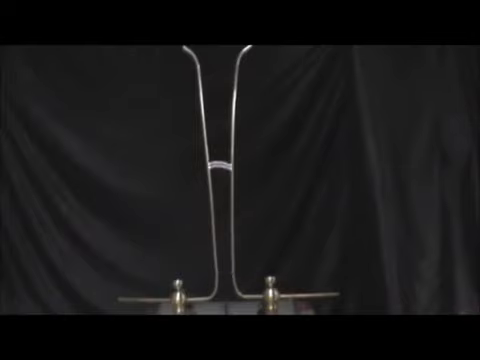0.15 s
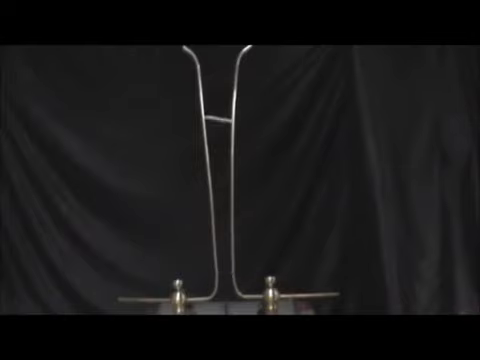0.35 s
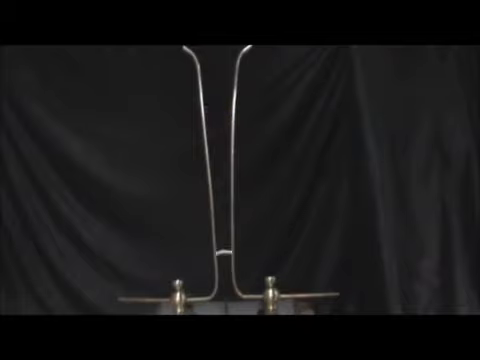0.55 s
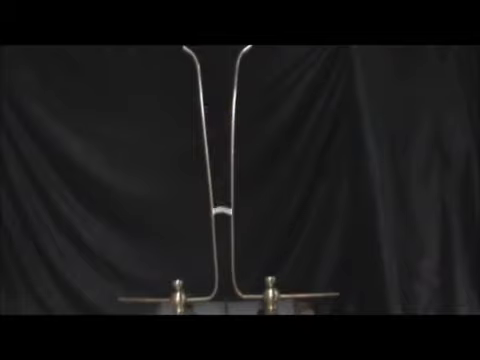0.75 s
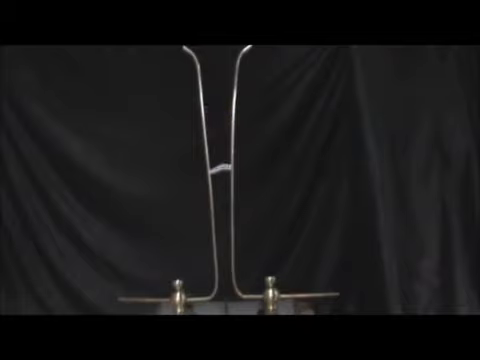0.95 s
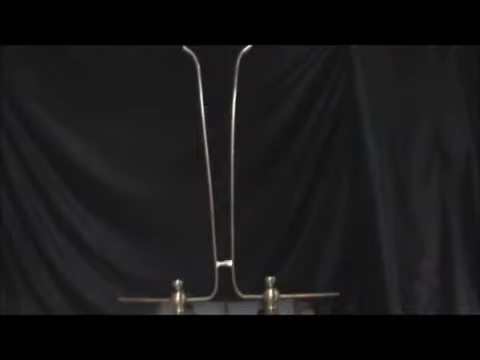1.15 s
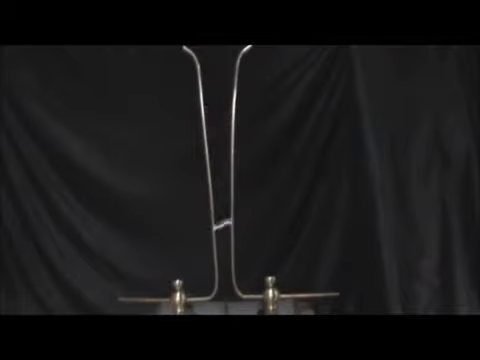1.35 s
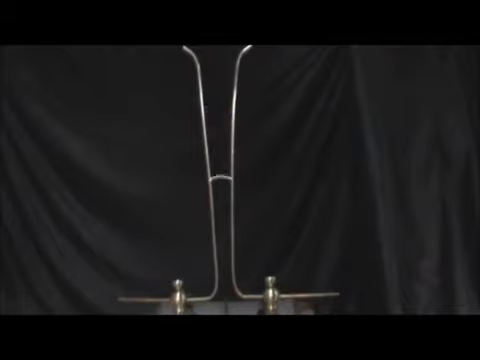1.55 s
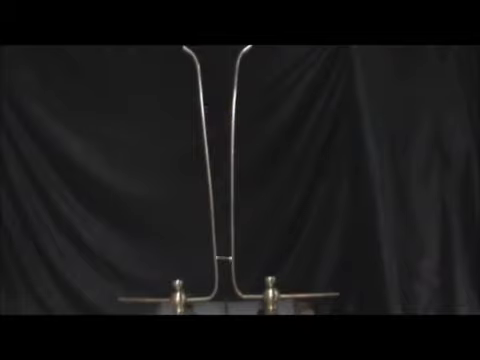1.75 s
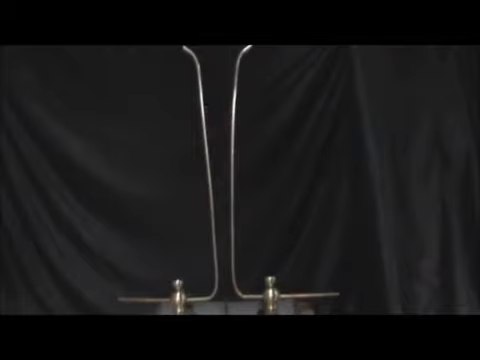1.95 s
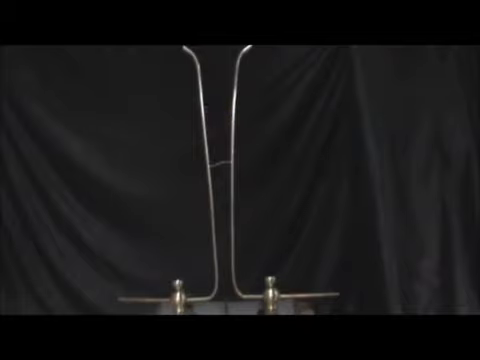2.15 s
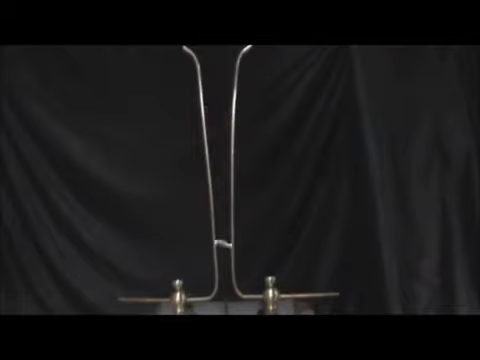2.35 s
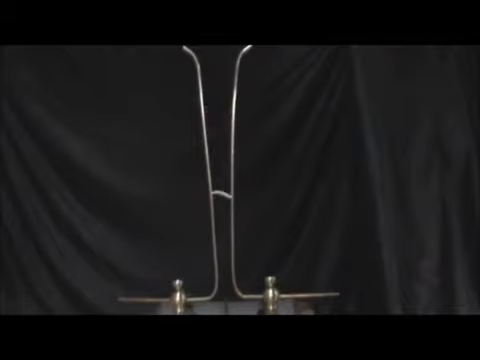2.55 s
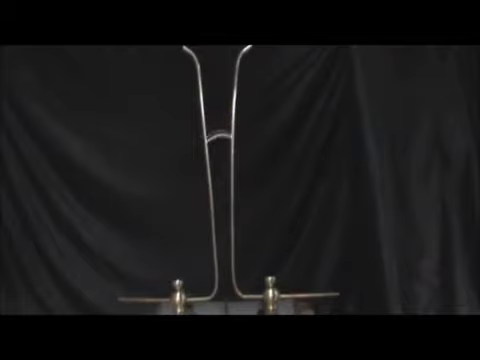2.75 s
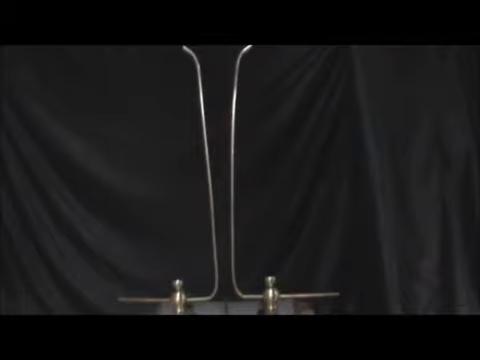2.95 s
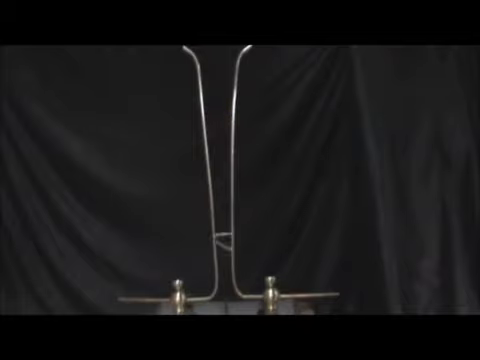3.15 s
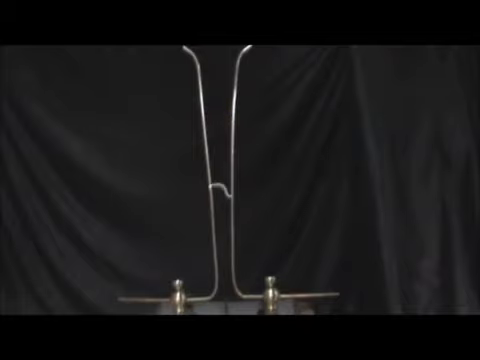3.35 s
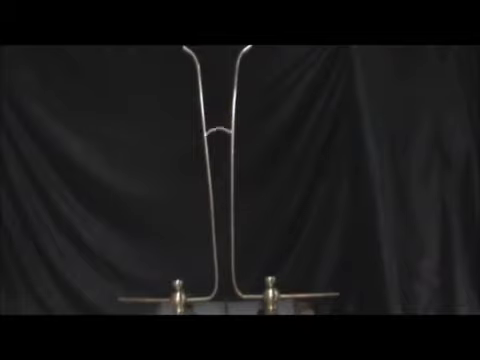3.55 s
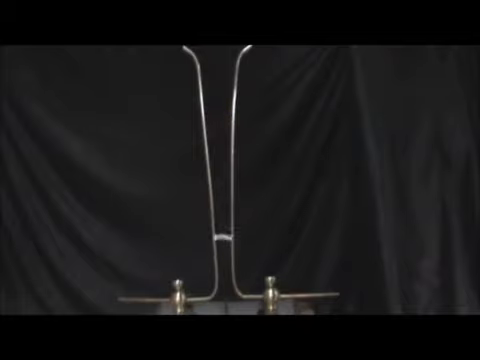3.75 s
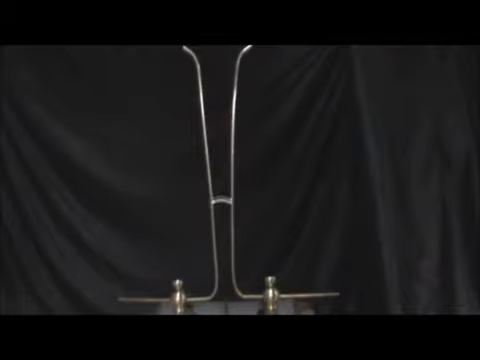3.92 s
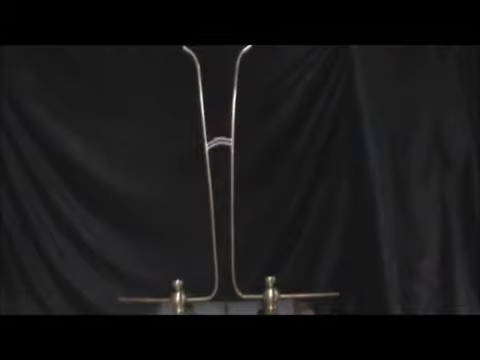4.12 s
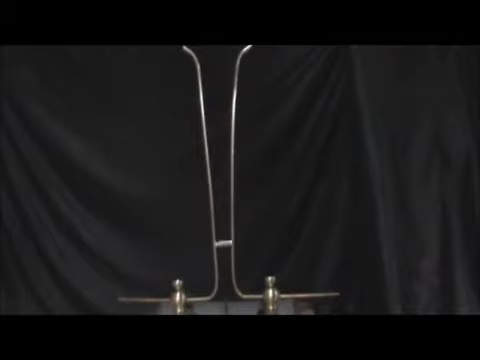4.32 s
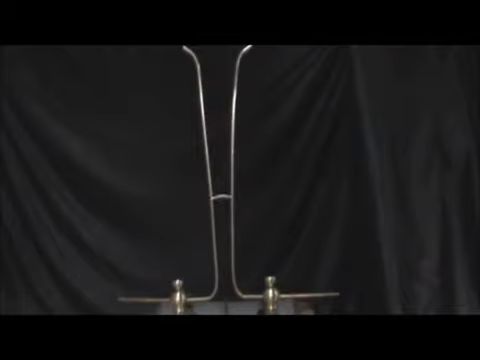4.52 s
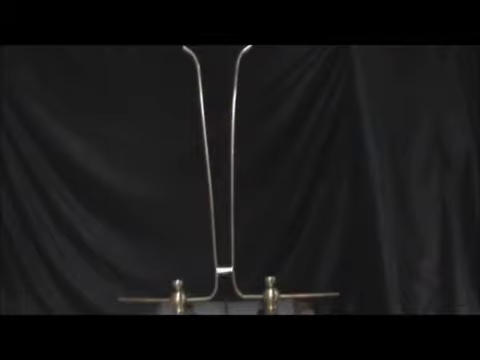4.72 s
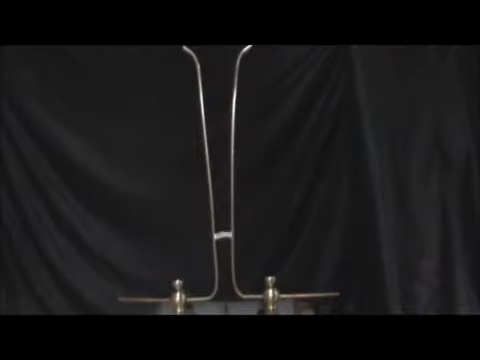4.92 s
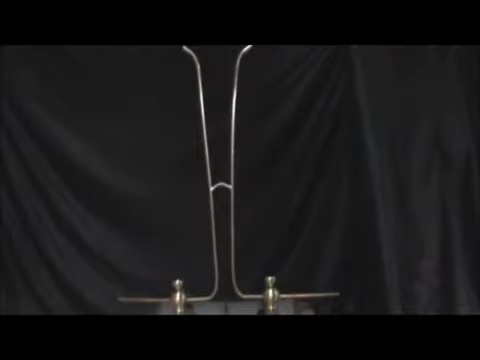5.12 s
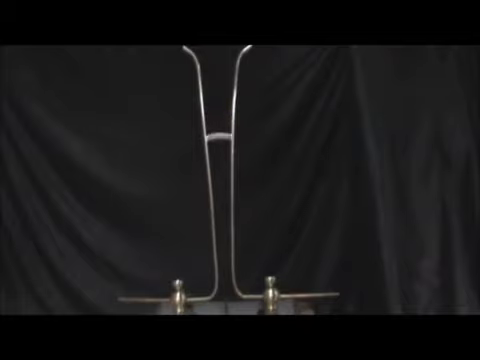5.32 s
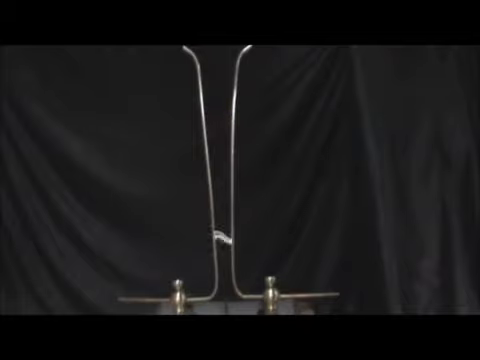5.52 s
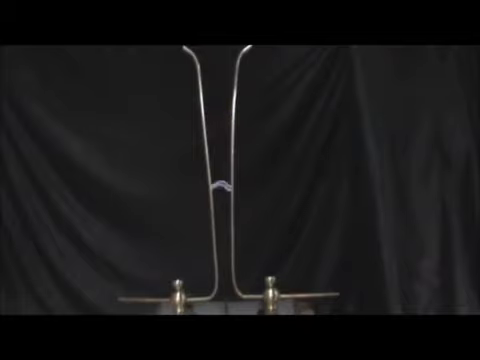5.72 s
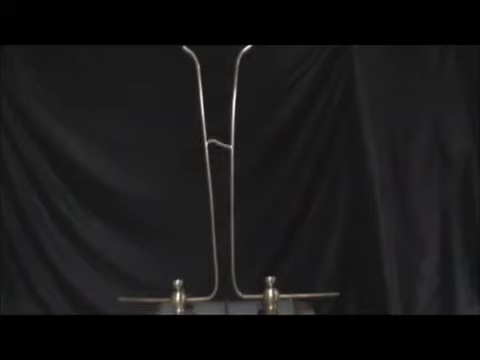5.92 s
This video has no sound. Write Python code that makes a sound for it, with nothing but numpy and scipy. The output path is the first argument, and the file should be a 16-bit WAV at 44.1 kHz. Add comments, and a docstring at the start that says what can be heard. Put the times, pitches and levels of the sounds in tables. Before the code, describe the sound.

An electric arc climbs two diverging wires in a draped room, close to a stereo microphone. A harsh, bright buzz of separate sparks runs throughout, slowing slightly and growing louder and raspier as each climb rises. Every half second or so it breaks off, then restarts at the bottom with a burst of hard snaps and low thumps. Brief skips interrupt it; faint hiss lies beneath.

```python
"""High-voltage climbing arc in a room

A coil fires some 75 sparks a second across two diverging wires, each a sharp click with echoes and scatter.
The arc climbs, breaks off and restrikes at the foot; its echo from the base lags more as it rises.
Now and then the coil misfires, and hard snaps kick the microphone's amplifier into a low thump.
One wall echo, a diffuse tail and a faint steady room hiss surround the sparks."""
import sys
import numpy as np
from scipy import signal
from scipy.fft import rfft, irfft, next_fast_len
from scipy.io import wavfile

SR = 44100
rng = np.random.default_rng(int(sys.argv[2]) if len(sys.argv) > 2 else 0)


def int16_out(signal):
    """Quantize to a 16-bit WAV file."""
    q = np.round(np.clip(np.atleast_2d(signal).T, -1, 1) * 32767)
    wavfile.write(sys.argv[1], SR, q.astype(np.int16))


N = 268035  # length [samples]


def arc(snaps, spark_db, snap_db, uneven_db, recharge_db, bright_db, snap_tilt_db, tilt_spread_db):
    """All sparks: height, a cooled channel and a longer charge of the coil set how loud each one fires."""
    cold_db, top_dull_db = 2.5, 1.1  # boost of a cold channel [dB]; brightness lost at the top [dB/octave]
    free = firing_times(snaps, jitter=.15)
    times = np.r_[free, snaps[:, 0]]
    order = np.sort(times)
    height, foot_db, top_db, power, climb_tilt_db, _, _ = climb(times)

    energy_db = (foot_db + (top_db - foot_db) * height ** np.abs(power))[:len(free)]
    energy_db = energy_db + cold_db * coldness(free, snaps)
    charge = np.interp(free, order[1:], np.diff(order)) * spark_rate(free)  # 1 = the usual interval
    free_db = energy_db + recharge_db * np.log2(charge) + uneven_db * rng.standard_normal(len(free))
    level_db = np.r_[free_db + spark_db, snaps[:, 2] + snap_db]

    tilt_db = bright_db + climb_tilt_db - top_dull_db * height
    tilt_db = tilt_db + tilt_spread_db * rng.standard_normal(len(times))
    tilt_db[len(free):] += snap_tilt_db
    return cracks(times, level_db, tilt_db, base_db=-11.5, terminal_db=-18.5, terminal_lead_ms=0.34,
                  rasp_hz=4390, rasp_width_hz=770, scatter_db=-3, scatter_t60=0.0079, size=512)


def cracks(times, level_db, tilt_db, base_db, terminal_db, terminal_lead_ms,
           rasp_hz, rasp_width_hz, scatter_db, scatter_t60, size):
    """Each spark is a sharp shock, then echoes from terminals and base, then scatter from the apparatus."""
    foot_lag_ms = 0.838  # lag of the base echo with the arc at the foot
    hz, t = np.fft.rfftfreq(size, 1 / SR), np.arange(size) / SR
    height, *_, rasp_db, top_lag_ms = np.array(climb(times))[:, :, None]

    def late(ms):
        """A pure delay, as a turn of phase."""
        return np.exp(-2j * np.pi * hz * ms / 1000)

    lag_ms = foot_lag_ms + (top_lag_ms - foot_lag_ms) * height
    echoes = amp(base_db) * late(lag_ms) + amp(terminal_db) * late(lag_ms - terminal_lead_ms)
    scatter = rng.standard_normal((2, len(times), size)) * np.sqrt(t) * amp(-60 * t / scatter_t60)
    scatter = amp(scatter_db) * rfft(scatter / np.linalg.norm(scatter, axis=2, keepdims=True))

    # near the top the long arc rasps in the upper middle
    rasp = rasp_db * height ** 2 * np.exp(-((hz - rasp_hz) / rasp_width_hz) ** 2)
    octaves = np.log2(np.clip(hz, 3000, 16000) / 8000)
    shock_db = level_db[:, None] + tilt_db[:, None] * octaves + rasp
    shock = amp(shock_db) * late(1)  # 1 ms into its frame, to hold the whole rise
    middle = placed(times - .001, irfft(shock * (1 + echoes + scatter[0])))
    side = placed(times - .001, irfft(shock * scatter[1]))
    return spread([middle, side])


# Plain misfires, where the coil skips a beat: (time of the next spark [s])
MISFIRES = [0.962, 1.129, 1.622, 2.018, 3.874, 3.958, 4.577, 5.769, 5.817]


def firing_times(snaps, jitter):
    """Ordinary sparks: an uneven train that runs from snap to snap and stops for each pause."""
    misfire_s, recharge_s = .024, .005  # pause of a misfire; least distance from a snap
    resume = np.r_[snaps[:, 0], MISFIRES]
    pause = np.r_[snaps[:, 1] / 1000, np.full(len(MISFIRES), misfire_s)]
    marks = np.sort(np.r_[0, resume - pause, resume, N / SR])
    waits = np.exp(jitter * rng.standard_normal((len(marks), 100)))
    times = []
    for start, end, wait in zip(marks, marks[1:], waits):
        if end - start < recharge_s:
            continue
        middle = (start + end) / 2
        dead = np.any((resume - pause < middle) & (middle < resume))
        # a dead stretch holds only the spark that ends it
        count = 1 if dead else max(1, round((end - start) * spark_rate(middle)))
        steps = np.cumsum(wait[:count] / spark_rate(np.linspace(start, end, count, endpoint=False)))
        times.extend(start + (end - start) * steps / steps[-1])
    times = np.array(times[:-1])
    return times[np.abs(times[:, None] - snaps[:, 0]).min(axis=1) > recharge_s]


def spark_rate(times):
    """Sparks a second, slowing as the arc rises: a wider gap takes longer to break down."""
    foot_rate, top_rate = 79, 70
    return foot_rate + (top_rate - foot_rate) * climb(times)[0]


FIRST_CLIMB_S = -.17  # the first climb is under way at the start


def coldness(times, snaps):
    """1 just after a pause that cools the channel, falling to 0 as the sparks reheat it."""
    cool_ms, reheat_s = 22, 0.057  # a snap's pause must be longer than this to cool; decay time
    resume = np.sort(np.r_[FIRST_CLIMB_S, snaps[snaps[:, 1] > cool_ms, 0], MISFIRES])
    since = times - resume[np.searchsorted(resume, times + 1 / SR) - 1]
    return np.exp(-since / reheat_s)


# The climb under way at the start, then one after each restrike:
# (relative energy at the foot [dB], at the top [dB], power of the height that it follows,
#  relative brightness [dB/octave], rasp at the top [dB], lag of the base echo at the top [ms])
CLIMBS = [(-14, -14, 1.2, -0.56, 7.5, 1.45), (-17, -6, 4.4, 0, 3.5, 1.314),
          (-16.5, -14, 1.96, 0.1, 4.5, 1.325), (-16, -12.5, 1.38, 0.4, 3, 1.3),
          (-16.5, -9, 1.97, 0, 7.5, 1.47), (-16, -14.5, 0.77, 0.76, 3, 1.345),
          (-17, -14.5, 1.6, 0.5, 3, 1.336), (-17, -10.5, 5.1, 0.7, 3, 1.263),
          (-18, -13, 0.78, -0.5, 0.5, 1.284), (-16.5, -6.5, 5.1, 0.5, 4, 1.318)]


def climb(times):
    """The arc's height (0 at the foot, 1 at the top) at these times, and the columns of its climb."""
    edges = np.r_[FIRST_CLIMB_S, np.array(RESTRIKES)[:, 0], N / SR]
    which = np.clip(np.searchsorted(edges, times, side="right") - 1, 0, len(CLIMBS) - 1)
    height = np.clip((times - edges[which]) / np.diff(edges)[which], 0, 1)
    return height, *np.array(CLIMBS)[which].T


# Single hard snaps during a climb:
# (time [s], pause before [ms], relative spark energy [dB],
#  left swing peak, right swing peak [signed, 1 = full scale])
SNAPS = [(0.2799, 25.4, -14, -0.014, .013), (0.5362, 17, -12.5, .003, 0.0011), (0.765, 31, -13, .104, .104),
         (0.8016, 26.8, -12.5, .051, 0.063), (0.8576, 14, -16.5, 0.0092, -.013),
         (1.1937, 27, -15, .1, -.003), (1.2097, 16, -11.5, .118, 0.089), (1.2224, 13, -10, -.027, -0.0033),
         (1.2347, 13, -11.5, .108, -.027), (1.3172, 28, -14.5, .105, .105),
         (1.6354, 14.8, -10.5, -0.0059, 0.0013), (1.9096, 23.4, -13.5, .046, 0.081),
         (2.0973, 32, -10.5, .001, -0.0012), (2.2301, 18.6, -12, 0.12, .1),
         (2.258, 14.7, -12.5, -.011, .03), (2.4023, 29.5, -13.5, .12, 0.11),
         (2.4596, 17.7, -18, 0.0043, 0.026), (2.8574, 24.4, -9.5, -0.047, 0.043),
         (3.0676, 13.8, -13.5, -0.0091, 0.068), (3.2965, 14.8, -18, 0.11, 0.093),
         (3.3081, 12, -13.5, 0.073, 0.062), (3.421, 26, -17, 0.032, .035),
         (3.9809, 23.8, -19.5, -.018, 0.053), (4.0415, 20, -16.5, -0.039, 0.0317),
         (4.0786, 22, -13.5, .1, .12), (4.1395, 27.3, -13.5, -0.038, 0.051),
         (4.1767, 14.6, -12.5, -.057, 0.049), (4.3826, 52, -13, .13, 0.098), (4.5466, 41, -13.5, .088, .11),
         (4.6554, 35, -13, .12, 0.11), (5.2034, 24.4, -10.5, 0.11, .12), (5.2474, 14.5, -10.5, .14, .087),
         (5.33, 16.2, -11, -0.0057, 0.022)]
# Restrikes, where the arc breaks off and starts again at the foot in a run of hard snaps:
# (time [s], pause before [ms], snaps [count], first interval [ms], later intervals [ms],
#  relative spark energy [dB], swing peak before the swell [1 = full scale],
#  greatest lean to the left [1 = full scale])
RESTRIKES = [(0.6114, 16, 5, 7, 14.3, -13, 0.1, .12), (1.2615, 26, 4, 6.7, 10.5, -12, .108, 0.074),
             (1.8191, 37, 2, 11.3, 13, -12.5, 0.1, .025), (2.3284, 24, 3, 12, 11.7, -11, 0.1, .045),
             (3.1025, 35, 8, 13.5, 13.15, -14, 0.081, .075), (3.7096, 26, 3, 11.4, 11.5, -14, 0.067, .038),
             (4.2958, 14, 3, 11.8, 10.9, -13.5, 0.083, .002), (4.844, 16, 4, 8.5, 14, -13, 0.082, .07),
             (5.5197, 14, 5, 11, 13.7, -14, 0.087, -.055)]


def hard_snaps():
    """Single snaps and the runs of the restrikes, which swell and sag, all as rows like those of SNAPS."""
    crest, sag_db = 0.47, 15.5  # share of the run where it crests; sag by the square of the distance from it
    lean_crest, lean_width = 0.29, 0.19  # thumps are lopsided early, then even out (shares of the run)
    jitter_ms, uneven_db = 0.97, 0.9  # scatter of the later snaps in time, and of all in strength
    rows = list(SNAPS)
    for s, pause_ms, count, first_ms, later_ms, energy_db, peak, most_lean in RESTRIKES:
        for k, (slip, chance) in enumerate(rng.standard_normal((round(count), 2))):
            after_ms = first_ms + later_ms * (k - 1) if k else 0
            if k > 1:
                after_ms += jitter_ms * slip
            share = (k + .5) / round(count)
            swell_db = uneven_db * chance - sag_db * (share - crest) ** 2
            thump = peak * amp(swell_db)
            lean = most_lean * np.exp(-((share - lean_crest) / lean_width) ** 2)
            rows.append((s + after_ms / 1000, 0 if k else pause_ms, energy_db + swell_db,
                         thump + lean, thump - lean))
    return np.array(rows)


def thumps(snaps, kick_s, recover_s, kick_share, tick_db, coupling_hz):
    """Interference kicks each amplifier channel; it swings back and settles through coupling capacitors."""
    s, _, energy_db, left, right = snaps.T
    t = np.arange(SR // 20) / SR

    def hump(rise):
        """A rise to 1 and a slower fall."""
        return t / rise * np.exp(1 - t / rise)

    def coupled(x):
        """The coupling capacitors, as a high-pass."""
        return signal.lfilter(*signal.butter(2, coupling_hz, "high", fs=SR), x)

    kick = -coupled(hump(kick_s) ** 2)
    swing = coupled(hump(recover_s)) + kick_share * kick
    swing = swing / swing.max()
    ticks = amp(energy_db + tick_db)[:, None] * kick  # even without a swing, a snap leaves a short pop
    return np.array([placed(s, ticks + peak[:, None] * swing) for peak in (left, right)])


# Spectrum of one spark's pressure click: (frequency [Hz], relative level [dB])
CLICK = [(40, -39.5), (160, -11), (550, -17.5), (1000, -10.5), (2000, -8), (4000, -3.5), (6500, -4),
         (8500, -2), (10200, 2), (12200, -3), (14900, -2), (15500, -17.5), (16300, -39)]
# Peaks and notches of the microphone housing: (centre [Hz], width [Hz], gain [dB])
HOUSING = [(1380, 240, -2.5), (2487, 114, -6.5), (4890, 470, 5.5), (5734, 194, -5.5), (7245, 197, -7)]


def coloured(x, size):
    """The spectrum of the spark's click, heard through the microphone housing."""
    hz = np.fft.rfftfreq(size, 1 / SR)
    housing_db = sum(db * np.exp(-((hz - centre) / width) ** 2) for centre, width, db in HOUSING)
    ring = causal(amp(along(CLICK, hz) + housing_db), size)
    return signal.fftconvolve(x, ring[None], axes=1)[:, :N]


# Decay of the room's diffuse tail, which is cut after half a second: (frequency [Hz], t60 [s])
ROOM = [(150, 0.81), (1000, 0.99), (5000, 0.22), (10000, 0.16), (15000, 0.29)]


def room(x, wet_db, count):
    """One distinct wall echo and a diffuse tail, drawn anew for each of count equal stretches."""
    wall_lag_ms, wall_db, drapes_hz = 5.66, -23, 12000
    wall = amp(wall_db) * filtered(x, lambda hz: np.exp(-2j * np.pi * hz * wall_lag_ms / 1000))

    hz, t, z = signal.stft(rng.standard_normal((count, 2, SR // 2)), SR, nperseg=256)
    decay = amp(-60 * t / along(ROOM, hz)[:, None])
    build_up = 1 - np.exp(-t / 0.00087)
    tails = signal.istft(z * decay * build_up, SR, nperseg=256)[1]

    wet = np.zeros((2, N + SR))
    for tail, span in zip(tails, np.array_split(np.arange(N), count)):
        tail = tail / np.linalg.norm(tail[0])
        answer = signal.fftconvolve(x.mean(axis=0)[None, span], tail, axes=1)
        wet[:, span[0]:span[0] + answer.shape[1]] += answer
    # the drapes swallow the highest treble of the tail
    wet = filtered(wet[:, :N], lambda hz: 1 / np.hypot(1, (hz / drapes_hz) ** 3))
    return wall + amp(wet_db) * spread(wet)


# Spectrum of the room hiss, strongest near 4 kHz: (frequency [Hz], relative level [dB])
HISS = [(20, -1), (60, -4), (110, -19), (180, -3), (400, 2.5), (1000, -9.5), (4000, 8), (16000, -10)]


def air(level_db):
    """The faint steady hiss of the room, as shaped noise."""
    noise = filtered(spread(rng.standard_normal((2, N))), lambda hz: amp(along(HISS, hz)))
    return amp(level_db) * noise / noise.std()


# Stereo width by frequency: (frequency [Hz], gain of the side signal [dB])
WIDTH = [(500, -4), (2200, -39), (4500, -24), (9000, -15), (14000, -4)]


def spread(pair):
    """Two signals as the middle and side of the sound; the side is faintest near 2 kHz."""
    side = filtered(pair[1], lambda hz: amp(along(WIDTH, hz)))
    return np.array([pair[0] + side, pair[0] - side])


def placed(times, shapes):
    """The sum of short shapes, one row for each time."""
    at = np.round(times * SR).astype(int)[:, None] + np.arange(shapes.shape[1])
    return np.bincount(np.maximum(at, 0).ravel(), shapes.ravel(), N)[:N]


def causal(gain, size):
    """The quickest causal ring with the shape of this magnitude response (minimum phase), of energy 1."""
    cepstrum = irfft(np.log(np.maximum(gain, 1e-6)))
    cepstrum[1:size // 2] *= 2
    cepstrum[size // 2 + 1:] = 0
    ring = irfft(np.exp(rfft(cepstrum)))
    return ring / np.linalg.norm(ring)


def filtered(x, response):
    """x times a response of frequency."""
    m = next_fast_len(N + SR // 2)
    return irfft(rfft(x, m) * response(np.fft.rfftfreq(m, 1 / SR)), m)[..., :N]


def along(points, hz):
    """(frequency [Hz], value) points read on a log frequency axis."""
    f, v = np.transpose(points)
    return np.interp(np.log(hz + 1), np.log(f + 1), v)


def amp(db):
    """Decibels to gain."""
    return 10 ** (np.asarray(db) / 20)


def scene():
    """Sparks in their room, thumps and room hiss."""
    snaps = hard_snaps()
    sparks = arc(snaps, spark_db=-1.38, snap_db=1.6, uneven_db=1.27, recharge_db=2.5,
                 bright_db=0.77, snap_tilt_db=2.5, tilt_spread_db=1.88)
    sound = coloured(sparks + room(sparks, wet_db=-4, count=20), size=4096)
    kicks = thumps(snaps, kick_s=0.00031, recover_s=0.00063, kick_share=0.84, tick_db=-22, coupling_hz=82.0)
    return sound + kicks + air(level_db=-55)


def record(dry):
    """A steep band limit: nothing passes from 16.5 kHz up."""
    return filtered(dry, lambda hz: hz < 16500)


dry = scene()
out = record(dry)
int16_out(out)
```